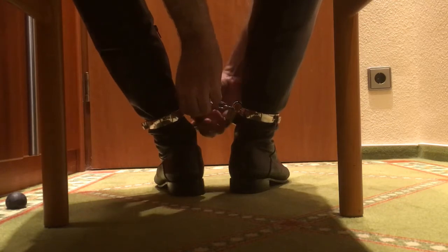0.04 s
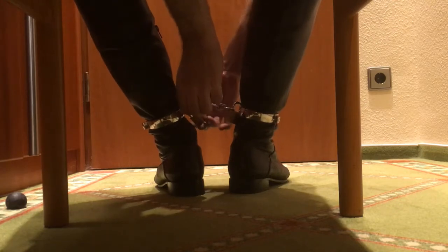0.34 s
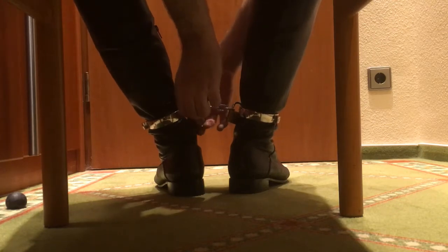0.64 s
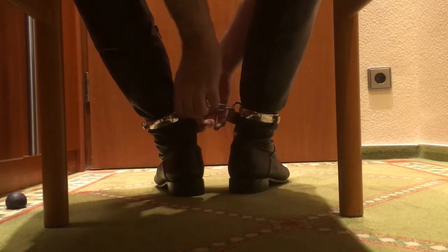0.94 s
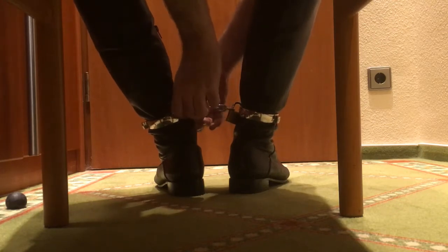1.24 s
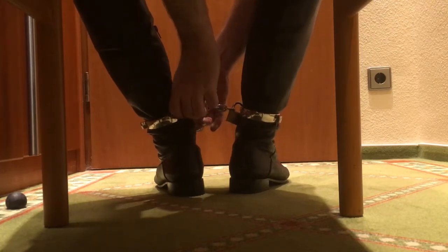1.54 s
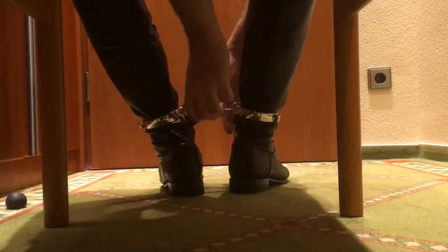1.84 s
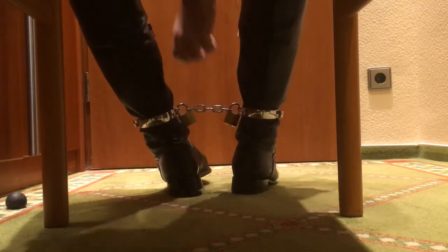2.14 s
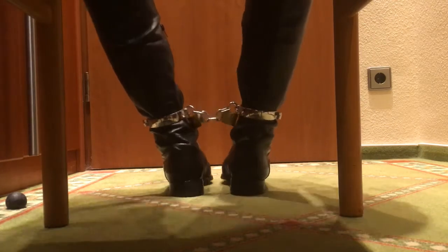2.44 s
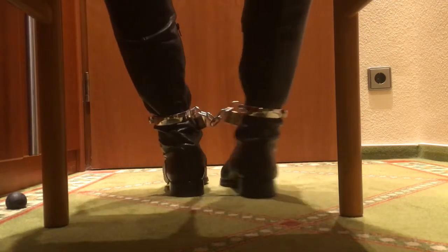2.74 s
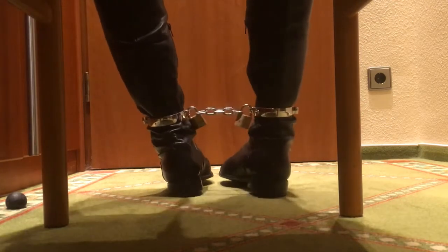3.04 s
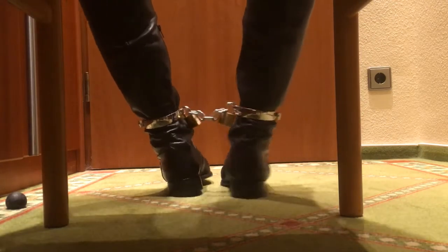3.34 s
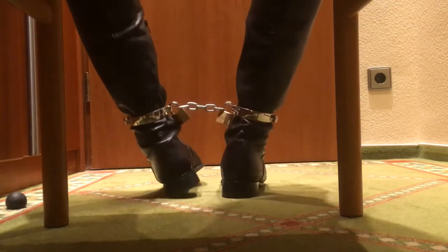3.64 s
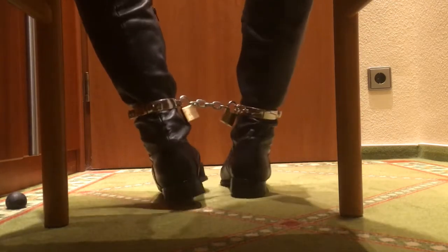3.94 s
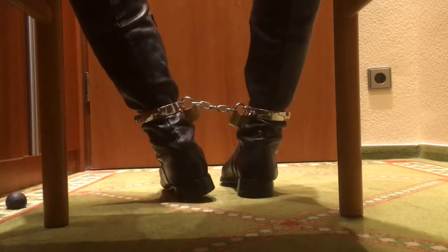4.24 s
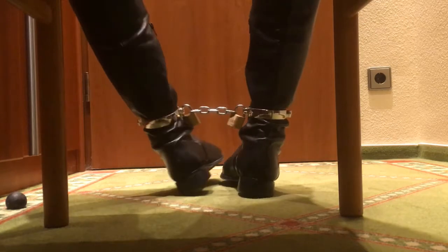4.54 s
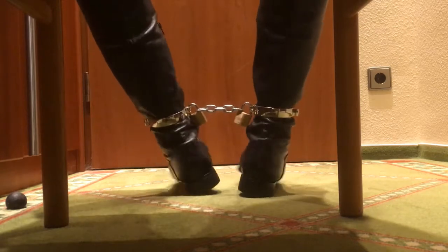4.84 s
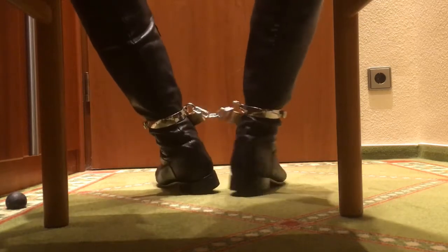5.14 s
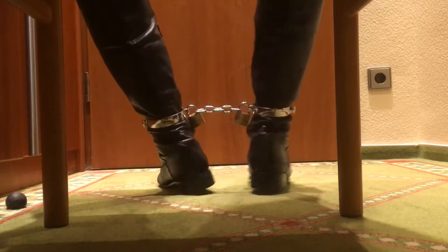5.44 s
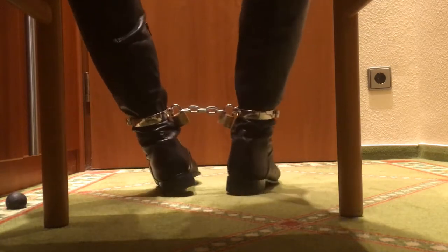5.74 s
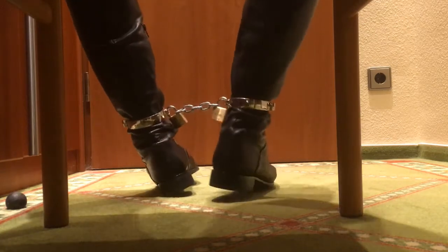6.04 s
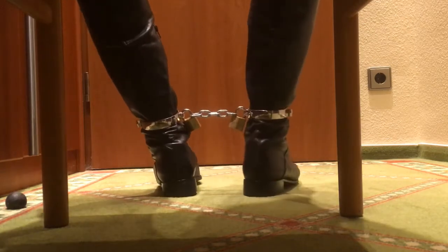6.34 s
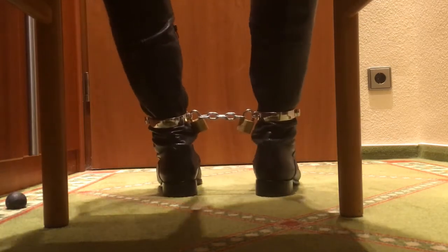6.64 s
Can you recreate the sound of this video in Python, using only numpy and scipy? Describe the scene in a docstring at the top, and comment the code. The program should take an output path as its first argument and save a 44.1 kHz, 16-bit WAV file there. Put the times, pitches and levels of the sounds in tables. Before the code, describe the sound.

A low steady rumble and faint hiss fill a small room. Steel leg irons are handled quietly, with a soft bump at the start and a light tick near 0.8 seconds. At about 1.2 seconds a padlock snaps shut with one sharp, bright click and a very brief ring, by far the loudest sound. Small clinks follow around 1.6 seconds. From about 2 seconds leather boots and trousers rustle faintly as the wearer shifts from foot to foot. Chain links and padlocks clink against the cuffs in a quick cluster from 2.4 to 2.9 seconds, then near 3.2, 3.5, 4.4 and 5 seconds, with a short rattle at 5.5. The clinks are thin, high and die quickly. Heels thud softly on carpet around 2.8, 3.6, 4.5 and 5.5 seconds. Only faint rustling and light scraping of links remain until the end, near 7 seconds.

```python
"""A padlock snaps shut on steel leg irons, then the wearer shifts from foot to foot in leather boots.
The lock's spring bolt snaps home; chain links and padlocks strike the cuffs, bounce and ring briefly.
Heels thud softly on carpet, and trousers and leather rustle as they rub.
Behind it all is a small room with a low steady rumble and a faint hiss."""
import sys
import numpy as np
from scipy import signal
from scipy.fft import rfft, irfft
from scipy.io import wavfile
from scipy.ndimage import uniform_filter1d

SR = 44100
rng = np.random.default_rng(int(sys.argv[2]) if len(sys.argv) > 2 else 0)


def log_audio(samples):
    """Write samples as a 16-bit WAV file to the path given in sys.argv[1]."""
    # one column per channel
    frames = np.atleast_2d(samples).T
    # limit to full scale, then quantise
    limited = np.clip(frames, -1, 1)
    pcm = np.round(limited * 32767).astype(np.int16)
    wavfile.write(sys.argv[1], SR, pcm)


N = 303391

# The tone of each noise. Each row: frequency in Hz, relative strength there in dB.
RUMBLE_TONE = [(15, -20), (45, 3), (72, 0.5), (100, -4), (140, -3), (260, -12.5), (400, -18.5), (900, -24),
               (5000, -48.5)]
HISS_TONE = [(2000, -2.5), (5000, -8), (9000, 2)]
LEATHER_TONE = [(100, -3), (260, 10), (450, 0), (700, 2.5), (1300, 1.5), (1900, -3.5), (2900, -1.5),
                (4500, -6.5), (10000, -31.5)]
CLOTH_TONE = [(1500, -16.5), (4000, -10), (6200, 3.5), (7700, -3), (9400, -0.5), (10600, -3), (12500, 1.5),
              (15500, -3)]
DRAG_TONE = [(1000, -17), (5600, -11), (6200, 0.5), (7200, -11.5), (15000, -15)]
TICK_TONE = [(300, -23), (1500, -11.5), (3600, -11), (4700, -3), (6400, 3), (7600, -3.5), (9400, 0.5),
             (10500, -3), (12300, 3), (16000, -11.5)]
SNAP_TONE = [(500, -28.5), (1200, -20.5), (3400, -18.5), (4000, -5.5), (4700, -10.5), (6200, 0),
             (7400, -8.5), (9200, 2.5), (10500, -3), (12800, 2.5), (15500, -3.5)]
# The room's echo. Each row: frequency in Hz, seconds to fade by 60 dB (called t60 below).
ROOM_FADE = [(1000, 0.39), (4000, 0.39), (9000, 0.15), (15000, 0.19)]
# How much the legs move. Each row: time in seconds, relative level of their rustle in dB.
LEG_EFFORT = [(0.0, -79.5), (0.92, -81), (1.68, -75), (2.09, -67), (2.61, -67), (2.76, -65), (2.93, -76),
              (3.26, -80), (3.41, -71), (3.93, -69), (4.12, -71), (4.33, -74), (5.5, -71), (6.07, -77),
              (6.25, -79.5), (6.88, -70)]
# Strokes of boot against trouser leg. Each row: start in seconds, length in seconds,
# relative level in dB, dB added for the cloth.
LEG_RUBS = [(0.116, .1, -73.5, 4.5), (0.531, 0.053, -67, -4), (1.847, 0.23, -69.5, -8),
            (2.08, 0.15, -66, 0.5), (2.376, 0.26, -60.5, -4.5), (3.238, .2, -68.5, 4.5),
            (3.632, 0.1, -63.5, 2), (3.739, 0.13, -61.5, -0.5), (4.468, .13, -71, 5), (4.8, .19, -71.5, 0),
            (5.307, 0.082, -66.5, -3), (5.519, 0.12, -65.5, -1), (5.74, 0.15, -72.5, -2),
            (6.313, 0.17, -78, -1), (6.572, 0.078, -67.5, -2.5), (6.816, .14, -69.5, 5)]
# Boots landing. Each row: start in seconds, level in dB, contact fade in ms, treble cut-off in Hz.
FOOTFALLS = [(2.771, -37, 9.4, 565), (2.790, -43, 20, 277), (2.883, -47, 21, 610), (3.578, -46, 2.3, 790),
             (4.535, -46, 4.3, 840), (4.924, -51, 8.7, 440), (5.123, -49.5, 21, 133.6),
             (5.492, -42, 23, 105)]
# The notes of a cuff damped by the boot. Each row: pitch in Hz, relative level in dB.
CUFF_NOTES = [(700, -4.5), (950, 0.5), (1080, -3), (1300, -11)]
# The notes of the padlock and links. Each row: pitch in Hz, relative level in dB.
STEEL_NOTES = [(3970, -7), (5170, -15.5), (5990, -11.5), (6470, 0.5), (8005, -3.5), (8700, -4.5),
               (9082, 0.5), (9415, 1), (9665, -2), (11267, -5), (11780, 1), (12000, -4.5), (12730, -4.5),
               (13383, -5), (14500, -1.5), (14742, -2)]
# Hands and boots bumping the cuffs. Each row: start in seconds, level in dB, contact fade in ms.
CUFF_KNOCKS = [(.080, -53.5, 1.9), (0.694, -62.5, 34), (1.651, -56.5, 20), (3.503, -55, 20),
               (4.419, -60, 23), (4.533, -51, 1.9)]
# Links dragging through each other. Each row: start in seconds, length in seconds, top level in dB.
LINK_DRAGS = [(2.438, 0.11, -54.5), (2.731, 0.13, -60.5), (3.237, 0.34, -67), (3.61, 0.15, -63),
              (4.363, 0.34, -68.5), (6.233, .17, -68.5), (6.516, 0.28, -70.5)]
# Steel striking steel. Each row: start in seconds, relative level in dB,
# dB added for the cuff's knock, time the rattle takes to settle in ms.
CHAIN_CLINKS = [(.786, -44.5, -1, 3.8), (1.447, -60, 4, 1.9), (1.598, -45, -7, 5.5),
                (1.609, -43.5, -12, 4.2), (1.748, -55, -7, 9.6), (2.41, -31.5, -18.5, 10.4),
                (2.567, -41.5, -18, 5), (2.62, -32.5, -22, 3.9), (2.644, -43.5, -15, 12),
                (2.698, -44.5, -9, 6), (2.843, -42.5, -6, 2.7), (2.86, -38.5, -10, 8),
                (2.873, -30, -12.5, 2.6), (3.2305, -33.5, -13, 6), (3.488, -48, 1, 1.5),
                (3.501, -38, -16, 2.8), (3.767, -48, -2.5, 3.3), (4.15, -54, -16, 3.5),
                (4.395, -54, -2, 2.2), (4.433, -34.5, -12.5, 3.8), (5.017, -35.5, -20.5, 4.5),
                (5.093, -50, -6, 2), (5.288, -41.5, -17, 0.88), (5.448, -34, -13, 1.5),
                (5.455, -36, -2, 12), (5.4685, -36, -6, 10.6)]
# The lock's shackle (its loop) sliding in, latching and bouncing.
# Each row: start in seconds, level in dB, contact fade in ms.
LATCH_CLICKS = [(1.143, -42.5, 15), (1.1507, -27.5, 4.2), (1.1539, -24, 1.9), (1.1569, -8.5, 0.97),
                (1.1579, -10, 2.1), (1.1617, -12.5, 1.1)]

RUMBLE_DB, HISS_DB = -61.5, -76.5


def from_db(db):
    """Turn decibels into a number to multiply a sound by."""
    return 10 ** (np.asarray(db) / 20)


def rms_one(x):
    """Scale a sound so that its average power is 1."""
    return x / np.sqrt(np.mean(x ** 2) + 1e-20)


def unit_energy(x):
    """Scale a response so that white noise passes through it at the same level."""
    return x / np.sqrt(np.sum(x ** 2) + 1e-20)


def seconds(length):
    """The time of each sample in a stretch of this length."""
    return np.arange(int(length * SR)) / SR


def at_hz(points, hz):
    """Read between the rows of a table, with octaves evenly spaced."""
    known_hz, values = np.transpose(points)
    return np.interp(np.log(hz + 0.0011), np.log(known_hz), values)


def colour(tone, size=8192):
    """A sharp click with the given tone, fading out at the top of hearing."""
    hz = np.fft.rfftfreq(size, 1 / SR)
    db = at_hz(tone, hz) + at_hz([(16000, 0), (18000, -20)], hz)
    # these steps pack the energy at the start of the click (minimum phase)
    cepstrum = irfft(np.log(from_db(db)))[:size // 2]
    one_sided = 2 * cepstrum * (np.arange(size // 2) > 0)
    return unit_energy(irfft(np.exp(rfft(one_sided, size))))


def through(x, response):
    """Pass a sound through a response: the way something answers a single tap."""
    return signal.oaconvolve(x, response)[:len(x)]


def add(track, s, sound):
    """Mix a sound in, starting at s seconds."""
    start = round(s * SR)
    track[start:start + len(sound)] += sound[:N - start]


def steady_noise(tone, db):
    """Even background noise of a given tone and level."""
    return from_db(db) * rms_one(through(rng.standard_normal(N), colour(tone)))


def room(x, early_db=-10, early_t60=0.073, tail_db=-14, build_s=0.0054):
    """Quick echoes from the door and furniture, then a smooth tail whose treble dies first."""
    t = seconds(.6)
    edges_hz = np.geomspace(60, 18000, 10)
    white, tail = rng.standard_normal(len(t)), 0
    for low, high in zip(edges_hz, edges_hz[1:]):
        band = signal.sosfiltfilt(signal.butter(2, [low, high], "band", fs=SR, output="sos"), white)
        tail = tail + band * np.exp(-np.log(1000) * t / at_hz(ROOM_FADE, np.sqrt(low * high)))
    early = rng.standard_normal(len(t)) ** 3 * np.exp(-np.log(1000) * t / early_t60)
    build_up = 1 - np.exp(-(t / build_s) ** 2)
    early = from_db(early_db) * unit_energy(early * build_up)
    tail = from_db(tail_db) * unit_energy(tail * build_up)
    return x + through(x, early + tail)


def friction(tone, grains_per_s, grain_db, size_db, patchy_db=2.6):
    """Sliding surfaces hiss, and some spots catch and let go with a tiny snap."""
    sizes = from_db(size_db * np.minimum(rng.exponential(1, N), 4)) * rng.choice([-1, 1], N)
    snaps = rms_one(sizes * (rng.random(N) < grains_per_s / SR))
    _, _, bands = signal.stft(rng.standard_normal(N) + from_db(grain_db) * snaps, nperseg=256)
    # the rubbing spot wanders, so narrow bands swell and fade for a few hundredths of a second
    patches = uniform_filter1d(rng.standard_normal(bands.shape), size=10, axis=1)
    patches = rms_one(uniform_filter1d(patches, size=3, axis=0))
    _, rubbing = signal.istft(bands * from_db(patchy_db * patches))
    return rms_one(through(rubbing[:N], colour(tone)))


def leg_movement(rise_s=0.033, fall_s=0.049):
    """How hard leather and cloth rub: slow effort, plus strokes that swell, hold and fade."""
    t = np.arange(N) / SR
    power = from_db(np.interp(t, *np.transpose(LEG_EFFORT))) ** 2
    for s, length, db, cloth_db in LEG_RUBS:
        stroke = np.clip(np.minimum((t - s) / rise_s, (s + length - t) / fall_s), 0, 1)
        power = power + (from_db([[db], [db + cloth_db]]) * stroke) ** 2
    return np.sqrt(power)


def rustle(leather_gain_db=3.0, cloth_gain_db=0.5):
    """Boot leather and trousers rub as the legs move."""
    leather_rub, cloth_rub = leg_movement()
    leather = leather_rub * friction(LEATHER_TONE, grains_per_s=240, grain_db=-6.5, size_db=-2.0)
    cloth = cloth_rub * friction(CLOTH_TONE, grains_per_s=800, grain_db=-6.5, size_db=4.0)
    return from_db(leather_gain_db) * leather + from_db(cloth_gain_db) * cloth


def contact(fade_ms, rise_share=0.13):
    """Rough surfaces press together and part again in a brief burst of tiny impacts."""
    t_ms = 1000 * seconds(.15)
    force = np.exp(-t_ms / fade_ms) * (1 - np.exp(-t_ms / (rise_share * fade_ms)))
    return force * rng.standard_normal(len(force))


def blow(response, db, fade_ms):
    """An object answers one contact; a longer contact carries more energy."""
    fade_ms = max(fade_ms, .3)
    samples = fade_ms * SR / 1000
    return from_db(db) * np.sqrt(samples / 2) * unit_energy(through(contact(fade_ms), response))


def boots(lowest_hz=55):
    """Carpet takes the treble off each footfall, each by its own amount."""
    out = np.zeros(N)
    for s, db, fade_ms, cutoff_hz in FOOTFALLS:
        carpet = signal.butter(2, [lowest_hz, cutoff_hz], "band", fs=SR, output="sos")
        thud = signal.sosfilt(carpet, signal.unit_impulse(SR // 10))
        add(out, s, blow(thud, db, fade_ms))
    return out


def ringing(notes, t60, uneven_db, detune):
    """Struck steel rings with fading notes; each blow varies their strength and, by detune, pitch."""
    hz, db = np.transpose(notes)[:, :, None]
    t = seconds(t60)
    strength = from_db(db + uneven_db * rng.standard_normal(hz.shape)) * rng.choice([-1, 1], hz.shape)
    pitch = hz * (1 + detune * rng.standard_normal(hz.shape))
    chord = np.sum(strength * np.sin(2 * np.pi * pitch * t), axis=0)
    return unit_energy(chord * np.exp(-np.log(1000) * t / t60))


def cuff_ring():
    """The low ring of a cuff, which depends on how it lies against the boot."""
    return ringing(CUFF_NOTES, t60=0.018, uneven_db=2, detune=.035)


def cuffs():
    """Soft bumps stir only the low notes of the cuffs."""
    out = np.zeros(N)
    for s, db, fade_ms in CUFF_KNOCKS:
        add(out, s, blow(cuff_ring(), db, fade_ms))
    return out


def dragging_links():
    """As the chain tightens, links grate over each other and sing in a narrow band."""
    pull = np.zeros(N)
    for s, length, db in LINK_DRAGS:
        add(pull, s, from_db(db) * np.sin(np.pi * seconds(length) / length))
    return pull * friction(DRAG_TONE, grains_per_s=250, grain_db=0, size_db=3)


def jostling_links(per_s=22, gain_db=19, spread_db=6.0):
    """Slack links tick against each other at random, harder the more the legs move."""
    _, cloth_rub = leg_movement()
    hardness = cloth_rub * from_db(gain_db)
    out = np.zeros(N)
    for start in np.flatnonzero(rng.random(N) < per_s / SR):
        if start > LATCH_CLICKS[-1][0] * SR:   # the chain hangs free once the lock is shut
            link = ringing(STEEL_NOTES, t60=0.0476, uneven_db=4, detune=.04)
            add(out, start / SR, hardness[start] * from_db(spread_db * rng.standard_normal()) * link)
    return out


def touches(count=4, bounce_s=.0055, graze_early_s=.004, graze_db=-16, graze_ms=3):
    """In every clink a link grazes its neighbour, strikes, then bounces ever more weakly."""
    for s, db, cuff_db, settle_ms in CHAIN_CLINKS:
        yield s - graze_early_s, db + graze_db, cuff_db, graze_ms
        fade_ms = 0.95 + 0.17 * settle_ms   # a looser rattle scrapes longer at each touch
        for k in range(count):
            late_s = bounce_s * k * rng.uniform(.9, 1.1)
            loss_db = 20 / np.log(10) * 1000 * late_s / max(settle_ms, .5)
            yield s + late_s, db - loss_db, cuff_db, fade_ms


def chain(gain_db=1.0, ring_db=-7, knock_db=-1.0):
    """Each touch is a sharp tick, a short ring of a link with its own pitches, and a cuff knock."""
    out = np.zeros(N)
    for s, db, cuff_db, fade_ms in touches():
        # the more a blow lands on the cuff, the duller its tick
        db_per_octave = -5.5 - 0.61 * cuff_db
        tone = [(hz, base + db_per_octave * np.log2(max(hz, 4000) / 8000)) for hz, base in TICK_TONE]
        tick = colour(tone, size=2048)
        link = ringing(STEEL_NOTES, t60=.055, uneven_db=3, detune=.03)
        add(out, s, blow(tick, db, fade_ms))
        add(out, s, blow(link, db + ring_db, fade_ms))
        add(out, s, blow(cuff_ring(), db + cuff_db + knock_db, fade_ms))
    return from_db(gain_db) * out


def padlock(ring_db=-1, knock_db=-25.5):
    """The shackle scrapes past the spring bolt, which snaps home and jolts the cuff."""
    out, snap = np.zeros(N), colour(SNAP_TONE)
    for s, db, fade_ms in LATCH_CLICKS:
        add(out, s, blow(snap, db, fade_ms))
        add(out, s, blow(cuff_ring(), db + knock_db, fade_ms))
    # the hardest snap leaves the lock ringing faintly
    s, db, _ = max(LATCH_CLICKS, key=lambda row: row[1])
    add(out, s, from_db(db + ring_db) * ringing(STEEL_NOTES, t60=0.093, uneven_db=-4.0, detune=0))
    return out


def scene():
    """Irons and boots in the room, over the rustle, the building's rumble and microphone hiss."""
    irons = padlock() + chain() + cuffs() + dragging_links() + jostling_links()
    wearer = room(irons + boots()) + rustle()
    return (wearer + steady_noise(RUMBLE_TONE, RUMBLE_DB) + steady_noise(HISS_TONE, HISS_DB))[None]


def record(dry):
    """Cut the very highest treble steeply."""
    cutoff_hz = 15800
    return signal.sosfilt(signal.ellip(10, .2, 70, cutoff_hz, fs=SR, output="sos"), dry)


dry = scene()
out = record(dry)
log_audio(out)
```